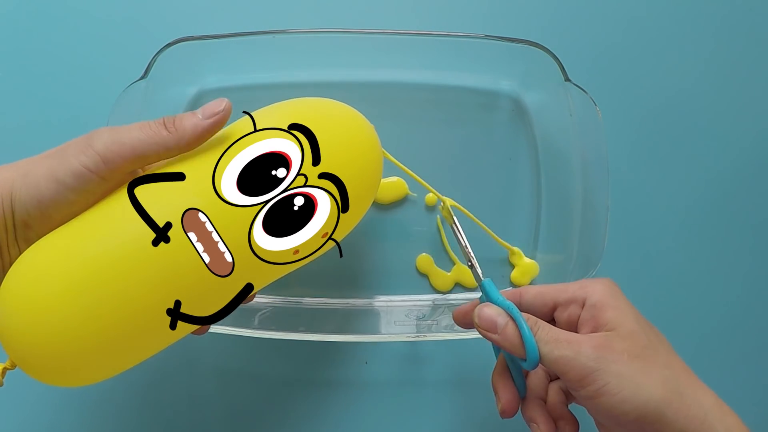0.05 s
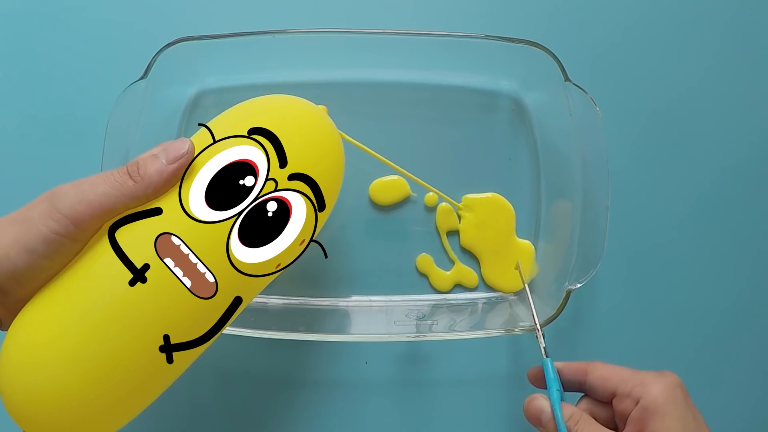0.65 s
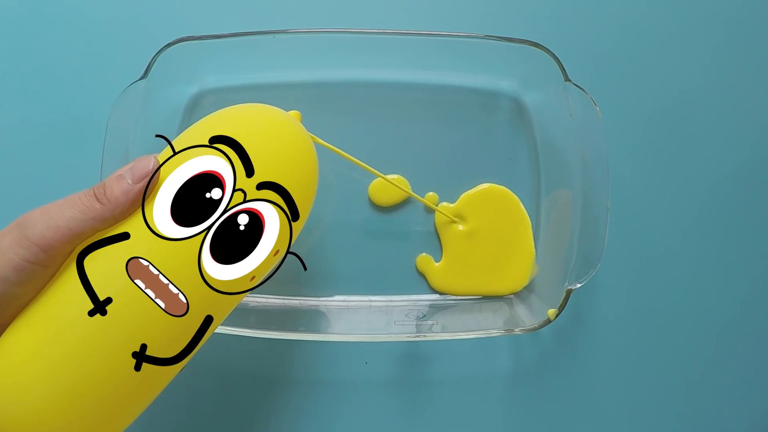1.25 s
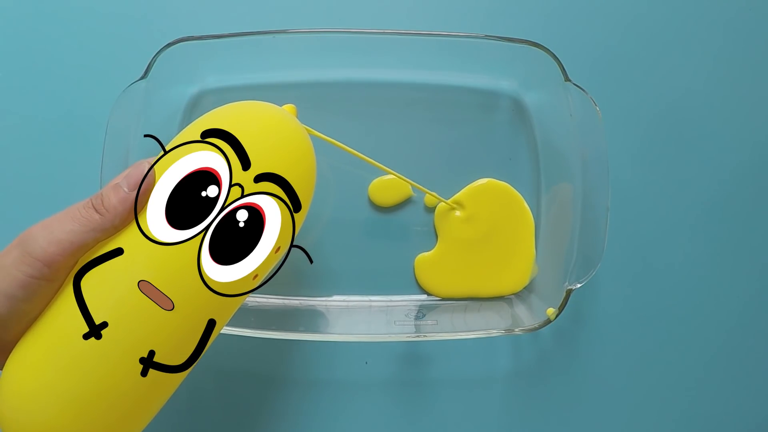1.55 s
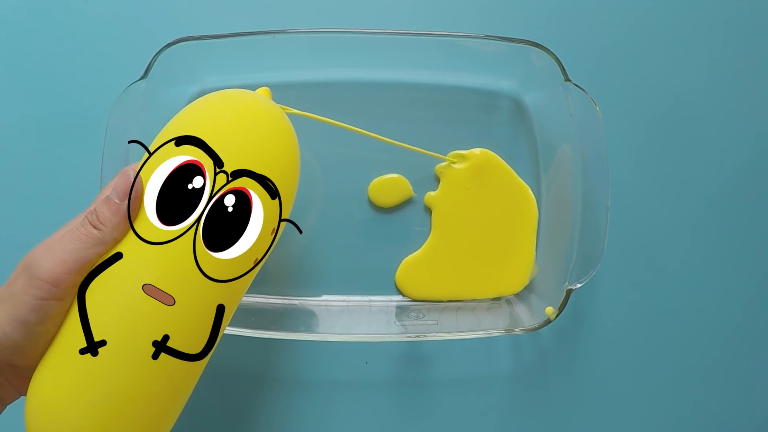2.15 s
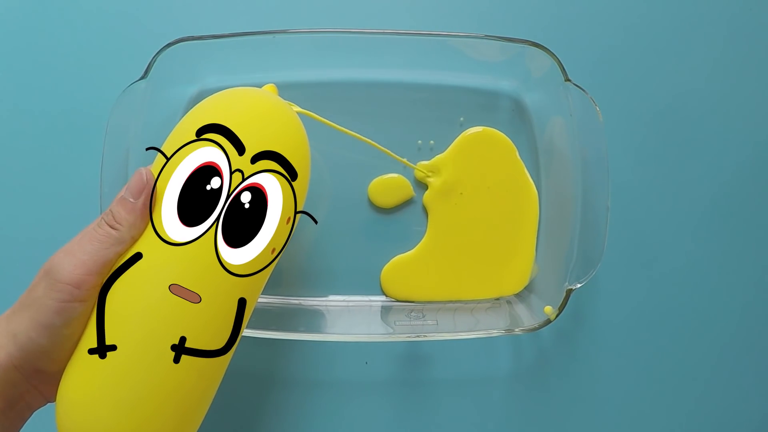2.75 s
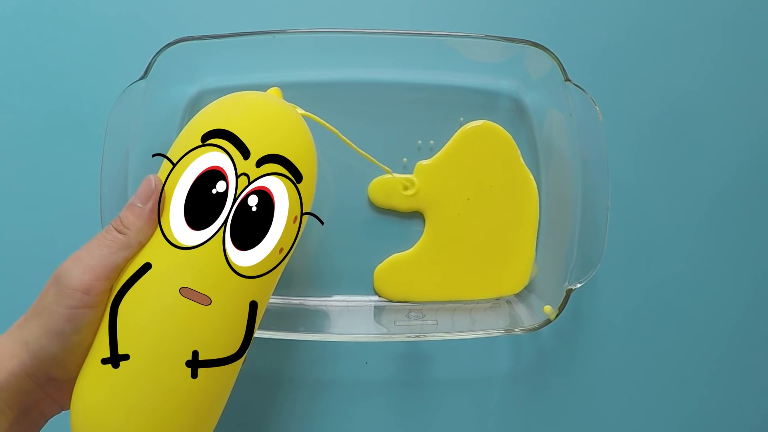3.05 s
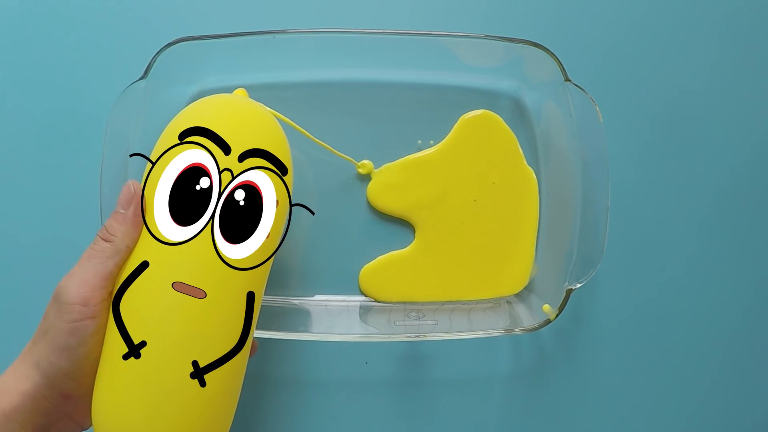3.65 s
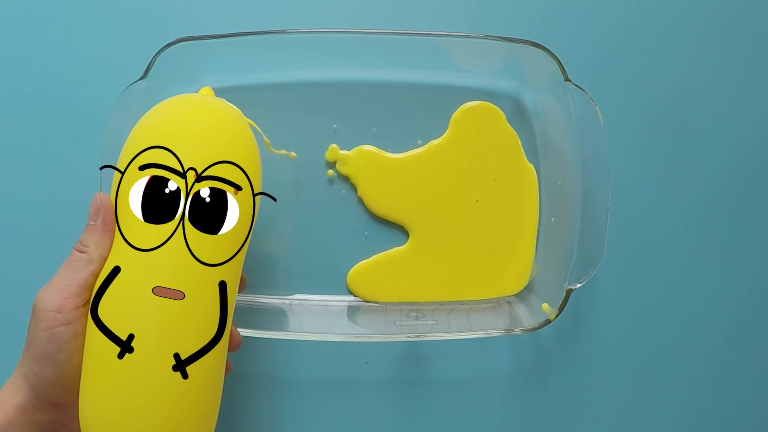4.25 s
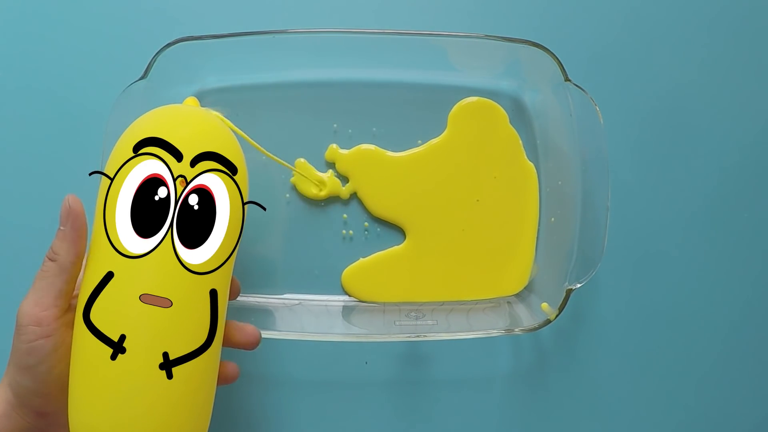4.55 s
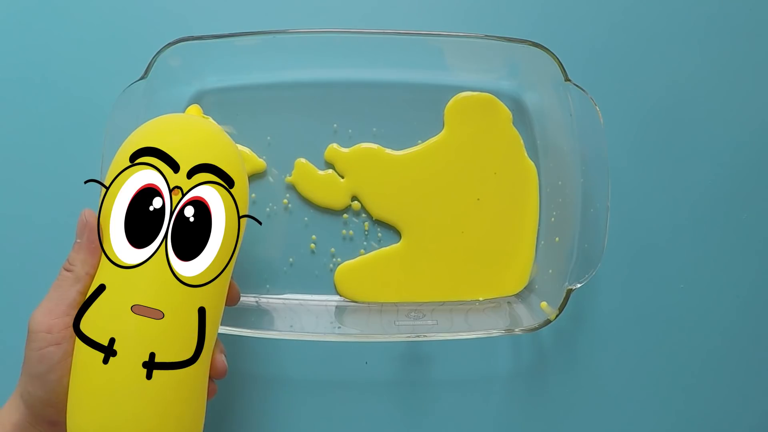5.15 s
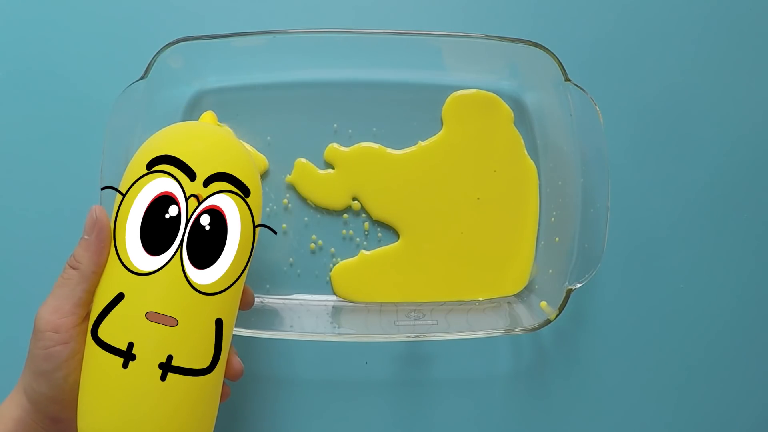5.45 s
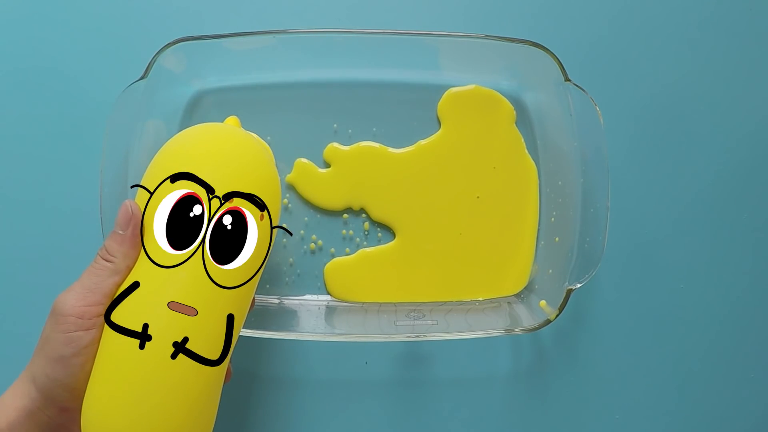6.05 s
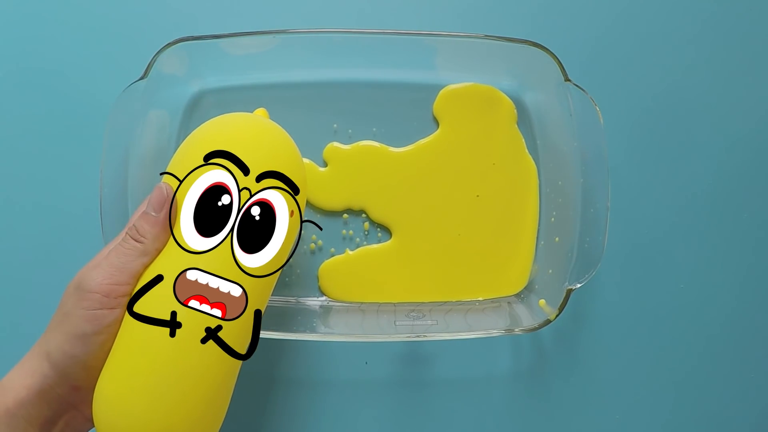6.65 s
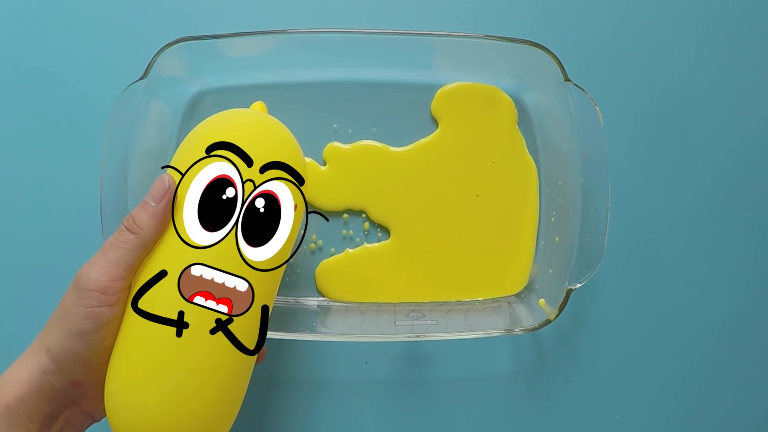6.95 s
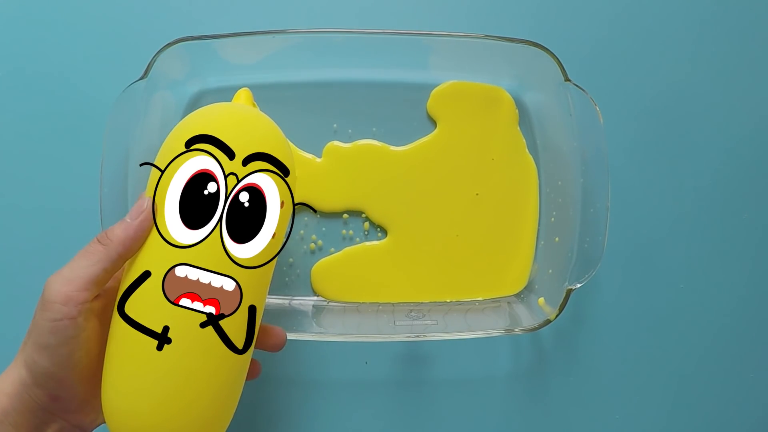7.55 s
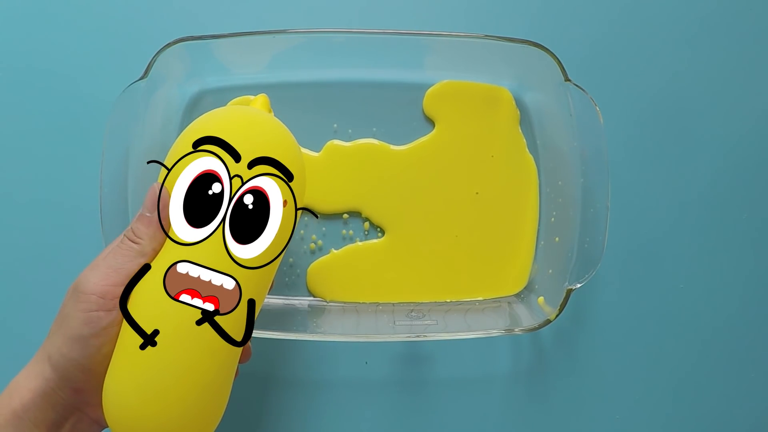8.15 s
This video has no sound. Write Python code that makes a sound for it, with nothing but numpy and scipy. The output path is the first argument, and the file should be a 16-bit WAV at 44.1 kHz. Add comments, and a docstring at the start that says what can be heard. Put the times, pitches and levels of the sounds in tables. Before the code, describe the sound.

Thick slime is squeezed through a slit in a balloon into a glass dish. Trapped air escapes in a rapid, uneven run of wet pops, spits and tiny high squeaks. After a short pause comes a louder cluster of pops, more squeaky sputtering, another pause and a last few pops. The sound is close, with a thin ring and a short echo in a bare, quiet room.

```python
"""Slime spurts from a snipped balloon into a glass dish, close up in a bare room.
Air caught in the slime escapes as it is squeezed: the rubber slit rasps and flutters in tiny rising
squeaks, and bubbles pop and spit droplets. The spurts set the balloon and the dish ringing thinly,
and the room carries each one on, over a faint rumble, hiss and hum."""
import sys
import numpy as np
from scipy import signal
from scipy.fft import rfft, irfft, next_fast_len
from scipy.io import wavfile
from scipy.ndimage import uniform_filter1d

SR = 44100
rng = np.random.default_rng(int(sys.argv[2]) if len(sys.argv) > 2 else 0)


def to_wav(s):
    """Save 16-bit WAV."""
    ch = np.atleast_2d(s).T  # columns
    pcm = np.round(np.clip(ch, -1, 1) * 32767)  # PCM
    wavfile.write(sys.argv[1], SR, pcm.astype(np.int16))


N = 365808
TIME = np.arange(N) / SR

# air squeaking through the slit: start_s, level_db, length_s, wetness (0 to 1)
SQUEAKS = [(0.646, -24, 0.0068, 0.5), (0.68, -28.5, 0.012, 1), (0.7626, -20.5, .007, 0.08),
           (.795, -17.5, 0.008, 0.34), (0.832, -22, 0.0097, 0.01), (.865, -18.5, 0.0077, 0.34),
           (.901, -20, .009, 0.08), (.937, -17.5, 0.0089, 0.22), (0.978, -22, 0.0034, 0.09),
           (1.01, -21, 0.011, 0.34), (1.05, -21, 0.0068, 0), (1.1353, -22, 0.0065, .3),
           (1.2036, -24.5, .008, .3), (1.468, -27.5, .016, 0.37), (1.62, -29.5, 0.0063, 1),
           (1.714, -34.5, .02, 0.9), (1.891, -23.5, 0.019, 0.2), (2.067, -31, 0.012, .8),
           (2.217, -26.5, 0.0098, 0.6), (2.346, -24.5, 0.0097, 0.26), (2.481, -30, 0.013, 0.3),
           (2.555, -26.5, 0.022, 0.17), (2.721, -31.5, 0.0081, 0.43), (2.759, -29.5, 0.036, 0),
           (2.983, -28, 0.014, 0.56), (3.072, -29, 0.0076, .5), (3.166, -27.5, 0.0081, .5),
           (3.26, -24, 0.0043, 0.28), (3.309, -32, .02, 0.33), (3.403, -25.5, 0.0056, 0.2),
           (3.458, -32, 0.02, 0.32), (3.56, -23.5, 0.0033, 0.21), (3.662, -32, 0.015, 0.9),
           (3.804, -27, 0.0057, 0.11), (3.864, -33, 0.0095, 0.02), (5.026, -26, 0.0093, 0.04),
           (5.076, -25, 0.016, 0.05), (5.14, -22, 0.0075, 0.12), (5.206, -42, 0.0053, 0),
           (5.275, -39.5, 0.0054, 0.16), (5.383, -31, 0.0023, 0), (5.431, -26, 0.0074, 0),
           (5.442, -25, 0.0069, 0.14), (5.6, -27.5, 0.019, 0.53), (5.658, -17, 0.0047, 0.08),
           (5.737, -23.5, 0.0055, 0.44), (5.803, -24.5, 0.01, .1), (5.843, -23.5, 0.01235, 0.33),
           (5.89, -23, 0.011, 0.2), (5.9395, -24, 0.0086, .3), (5.993, -20.5, 0.0092, 0.1),
           (6.041, -23.5, 0.01, 0.41), (6.099, -19.5, 0.0077, 0.02), (6.145, -27, 0.0097, 0.68),
           (6.197, -27, .011, 0.66), (6.246, -28, .014, 0.9), (6.317, -24.5, 0.0047, 0.54),
           (6.393, -25.5, 0.0088, 0.28), (6.457, -26, 0.009, 0.17), (6.52, -28.5, 0.012, 0.42),
           (6.574, -26.5, 0.011, 0.95), (6.625, -25.5, 0.0076, .9), (6.6785, -23, .016, 0.31),
           (6.747, -22.5, 0.012, 0.04), (6.8, -22, 0.0066, .1), (6.807, -27.5, 0.006, 0.04),
           (7.009, -33, 0.013, .1), (7.0442, -29.5, 0.0027, 0.9)]
# big bubbles bursting with a pop and a wet spit: peak_s, pop_db, spit_db
POPS = [(.687, -27, -42.5), (.716, -25, -23.5), (1.065, -26.5, -27), (1.09, -25.5, -22.5),
        (1.135, -30, -22.5), (1.143, -20, -28), (1.206, -16.5, -19), (1.234, -24.5, -36.5),
        (1.262, -21.5, -22), (1.3, -23, -28), (1.333, -21, -31), (1.38, -28, -28.5), (1.422, -19, -23),
        (1.47, -17, -22.5), (1.493, -21.5, -25), (1.53, -26.5, -29), (1.563, -20, -34.5),
        (1.573, -18.5, -25.5), (1.64, -18, -25), (1.72, -21.5, -25), (1.734, -22.5, -34), (1.761, -22, -32),
        (1.785, -26.5, -28.5), (1.805, -24, -26.5), (1.838, -20, -34), (1.9, -20, -27.5),
        (1.928, -31.5, -25.5), (1.941, -37, -29), (1.98, -23.5, -23), (1.99, -22, -25),
        (2.062, -18.5, -26.5), (2.071, -25, -23.5), (2.129, -26.5, -28.5), (2.14, -20.5, -36),
        (2.156, -24.5, -34), (2.223, -21.5, -30.5), (2.272, -20, -24), (2.284, -33, -33),
        (2.352, -19.5, -23), (2.486, -21.5, -25.5), (2.513, -28, -29), (2.571, -21, -23.5),
        (2.657, -19, -26), (2.712, -26.5, -46.5), (2.766, -19.5, -26.5), (2.798, -20.5, -24),
        (2.87, -25.5, -27), (2.888, -23.5, -30), (2.988, -23.5, -37), (3.003, -25.5, -29),
        (3.048, -43, -34), (3.079, -22.5, -24.5), (3.183, -26, -35.5), (3.315, -22.5, -30),
        (3.479, -24, -49), (3.59, -22, -27), (3.687, -20.5, -22), (3.872, -26.5, -22), (3.9, -25, -35),
        (4.799, -12.5, -30), (4.817, -8, -22), (4.826, -23.5, -24), (4.85, -22, -35.5), (4.873, -17, -29.5),
        (4.886, -13.5, -25.5), (4.909, -23.5, -32.5), (4.928, -20.5, -24.5), (5.429, -24, -29.5),
        (5.472, -32, -27), (5.489, -29, -28.5), (5.538, -23, -18), (5.559, -18, -29.5), (5.608, -17, -26.5),
        (5.657, -21.5, -21.5), (5.68, -26.5, -24), (5.74, -23, -29.5), (6.618, -31, -35), (6.803, -28, -47),
        (6.811, -26.5, -32), (6.833, -29.5, -26), (6.856, -26.5, -37), (6.876, -27, -34.5),
        (6.925, -29.5, -30), (7.046, -34, -28.5), (8.091, -23, -44.5), (8.103, -14, -21), (8.116, -33, -45),
        (8.138, -21, -30.5), (8.169, -25, -33), (8.195, -15.5, -34), (8.263, -23.5, -29)]
# the balloon rings higher and goes slack as it empties; levels are relative to a pop:
# time_s, low_mode_hz, high_mode_hz, ring_db, flap_db
BALLOON = [(0, 1310, 3177, -9, -32), (1.2, 1470, 3230, -28.5, -17), (3.65, 1590, 3497, -28.5, -25),
           (3.87, 1530, 3558, -15.5, -20), (4.9, 1530, 3486, -29.5, -15), (5.7, 1670, 3787, -21, -17.5),
           (6.9, 1706, 3826, -22.5, -8.5), (8.3, 1703, 3710, -38, -14)]


def amp(db):
    return 10 ** (np.asarray(db) / 20)


def unit(x):
    return x / np.sqrt(np.mean(x ** 2) + 1e-20)


def spectrum_at(points, hz):
    """A spectrum's value at hz, joined on a log-frequency axis."""
    freqs, values = np.transpose(points)
    return np.interp(np.log(hz + 1), np.log(freqs + 1), values)


def along(table, s):
    """The columns of a curve at time s."""
    times, *columns = np.transpose(table)
    return [np.interp(s, times, column) for column in columns]


def add(mix, start_s, sound):
    part = mix[max(round(start_s * SR), 0):][:len(sound)]
    part += sound[:len(part)]


def colour(x, points):
    """Filters x by a spectrum; white noise keeps its power."""
    size = next_fast_len(len(x))
    gain = unit(amp(spectrum_at(points, np.fft.rfftfreq(size, 1 / SR))))
    return irfft(rfft(x, size) * gain, size)[:len(x)]


def resonate(x, hz, width_hz):
    """A resonance that follows the curve hz."""
    turn = np.exp(2j * np.pi * np.cumsum(hz * np.ones(len(x))) / SR)
    pole = np.exp(-np.pi * width_hz / SR)
    return 2 * (turn * signal.lfilter([1 - pole], [1, -pole], x / turn + 1e-18)).real


def wobble(count, smooth):
    """A random waver of rms 1, smoothed over `smooth` samples."""
    return unit(uniform_filter1d(uniform_filter1d(rng.standard_normal(count), smooth), smooth))


def swell(t, length_s, rise, fall):
    """A burst envelope that peaks at t = 0: steep before, dying exponentially after."""
    return np.where(t < 0, np.exp(-(t / (rise * length_s)) ** 2), np.exp(-abs(t) / (fall * length_s)))


def fade(t, t60_s):
    return amp(-60 * t / t60_s)


def room_tone(noise_db=-60, hum_hz=49, overtone_db=-2.0):
    """Quiet room rumble and hiss, with a low hum that grows late on."""
    # rumble sloping off into hiss: freq_hz, gain_db
    noise_colour = [(20, -40.5), (35, -20.5), (55, -0.5), (110, 0.5), (200, -6), (350, -7.5), (600, -17.5),
                    (1400, -21), (2500, -25), (8000, -27.5), (15000, -33)]
    # the hum's slow rise: time_s, level_db
    hum_level = [(0, -90.5), (6.2, -77.5), (7.2, -66.5), (8.3, -64)]
    noise = unit(colour(rng.standard_normal(N), noise_colour))
    phase = 2 * np.pi * hum_hz * TIME
    hum = unit(np.sin(phase) + amp(overtone_db) * np.sin(4 * phase))
    return amp(noise_db) * noise + amp(along(hum_level, TIME)[0]) * hum


def opening_tail(level_db=-39.5, t60_s=0.62, ring_db=-6.5, ring_t60_s=0.58):
    """An earlier spurt is still dying away in the room and in the balloon."""
    # the spurt's lingering wash: freq_hz, gain_db
    wash_colour = [(180, -49), (300, -33), (869, -19.5), (1250, 0), (2690, -17.5), (3170, 0), (3610, -19.5),
                   (5350, -5), (5900, -10), (15000, -28.5)]
    wash = unit(colour(rng.standard_normal(N), wash_colour)) * fade(TIME, t60_s)
    high_mode_hz = BALLOON[0][2]
    ring = np.sin(2 * np.pi * high_mode_hz * TIME) * fade(TIME, ring_t60_s)
    return amp(level_db) * (wash + amp(ring_db) * ring)


def room_tail(build_s=0.00067):
    """Dense reflections, each band dying at its own speed."""
    # how long the bare room rings: freq_hz, t60_s
    decay_times = [(200, .5), (800, 0.67), (2000, 0.66), (5500, 0.61), (9000, .55), (15000, 0.52)]
    # tone of the reflections: freq_hz, gain_db
    wall_colour = [(100, 12), (1500, -1), (2500, 3), (5000, 0.5), (8000, -2.5), (11000, -2), (15000, 1)]
    hz, t, bands = signal.stft(rng.standard_normal(SR), SR, nperseg=256)
    bands *= fade(t, spectrum_at(decay_times, hz)[:, None])
    tail = signal.istft(bands, SR, nperseg=256)[1][:SR]
    build = 1 - np.exp(-(TIME[:SR] / build_s) ** 2)
    tail = colour(tail * build, wall_colour)
    return tail / np.linalg.norm(tail)


def room(x, wet_db=-6.0, table_db=-19.0, table_s=0.0031, drift_hz=1.293, tails=3):
    """The table throws back one close echo, the walls a long tail that shifts as the balloon moves."""
    echo = np.interp(TIME - table_s, TIME, x)
    walls = np.zeros(N)
    for k in range(tails):
        crossfade = np.cos(np.pi * (drift_hz * TIME + k / tails))
        walls += signal.oaconvolve(x * crossfade, room_tail())[:N]
    return amp(table_db) * echo + amp(wet_db) * walls * np.sqrt(2 / tails)


def dish(x):
    """The spurts set the glass dish ringing faintly."""
    # modes of the glass: pitch_hz, width_hz, gain_db
    modes = [(732, 9.9, 0.5), (5010, 38, -1), (5443, 28, -3), (7550, 18, -4.5)]
    return sum(amp(db) * resonate(x, hz, width_hz) for hz, width_hz, db in modes)


def balloon(x, low_db=-11.5, low_width_hz=80, high_t60_s=0.516, waver_hz=32,
            third_hz=5200, third_db=-10.5, third_t60_s=0.27):
    """The low mode booms along with every spurt; each big pop also kicks a thin, wavering ring and a fainter,
    shorter tone near 5.2 kHz."""
    out = amp(low_db) * resonate(x, along(BALLOON, TIME)[0], low_width_hz)
    t = TIME[:SR // 2]
    for s, pop_db, _ in POPS:
        _, high_hz, ring_db, _ = along(BALLOON, s)
        phase = 2 * np.pi * np.cumsum(high_hz + waver_hz * wobble(len(t), smooth=400)) / SR
        ring = np.sin(phase) * fade(t, high_t60_s)
        ring += amp(third_db) * np.sin(third_hz / high_hz * phase) * fade(t, third_t60_s)
        add(out, s, amp(pop_db + ring_db) * ring * rng.choice([-1, 1]))
    return out


def ticks(decay_s=0.00086, width_hz=3500):
    """Tiny damped ticks of rubber and slime."""
    # stray ticks between squeezes: start_s, peak_db, pitch_hz
    strays = [(.3494, -63, 3000), (4.096, -33.5, 5460), (4.4508, -37, 8560), (8.005, -44.5, 1560)]
    out, t = np.zeros(N), TIME[:SR // 50]
    for s, db, hz in strays:
        tick = resonate(rng.standard_normal(len(t)) * np.exp(-t / decay_s), hz, width_hz)
        add(out, s, amp(db) * tick / abs(tick).max())
    return out


def rasps(length_s=0.0067, lead_s=0.006):
    """Air rushes through the parting slit just before the rubber starts to flutter."""
    # strength of the rasp relative to its squeak: time_s, gain_db
    rasp_level = [(.65, -43), (1.1, -19), (2.5, -6), (3, -4.5), (3.55, -7), (5, -22.5), (6.4, -24),
                  (6.6, -8.5), (6.8, -11)]
    # tone of the rushing air: freq_hz, gain_db
    rasp_colour = [(400, -41), (1200, -7), (2100, 3.5), (4000, 2.5), (6000, -8), (9500, -3), (13000, -24)]
    envelope, t = np.zeros(N), np.arange(-SR // 100, SR // 40) / SR
    for s, db, *_ in SQUEAKS:
        puff = amp(db + along(rasp_level, s)[0]) * swell(t, length_s, rise=0.26, fall=0.76)
        add(envelope, s - lead_s + t[0], puff)
    return envelope * unit(colour(rng.standard_normal(N), rasp_colour))


def squeaks(rise=0.16, jitter=0.02, sweep=0.48, open_share=0.19, hiss=0.081, flicker_db=4.0,
            dry_width_hz=890, wet_width_hz=8800, wet_lift_hz=1520, low_cut_hz=1280):
    """Air flutters the rubber slit; its resonance climbs and levels off, and low partials die first."""
    # the slit's lips tighten and ease with the squeeze: time_s, flutter_hz, resonance_hz
    slit = [(.65, 1937, 8000), (.77, 1660, 8170), (.9, 1600, 6970), (.94, 1926, 7470), (1.5, 1711, 7860),
            (2.3, 1682, 8780), (3.86, 1790, 8380), (5.02, 1890, 8460), (5.14, 1928, 5820),
            (5.42, 1788, 5200), (5.66, 1842, 8350), (5.81, 1617, 7170), (5.89, 1650, 7600),
            (6.02, 1964, 8300), (6.21, 1772, 7300), (6.38, 2090, 7630), (6.58, 1733, 7700),
            (6.68, 1817, 5830), (6.75, 1637, 6800), (6.81, 1708, 5830)]
    out, harmonic = np.zeros(N), np.arange(1, 9)[:, None]
    for s, db, length_s, wet in SQUEAKS:
        count = max(int(length_s * SR), 64)
        progress = np.linspace(0, 1, count)
        flutter_hz, slit_hz = along(slit, s)
        flutter_hz *= (0.01 / length_s) ** 0.087  # longer squeaks come from bigger bubbles and sit lower
        climb = rise * (np.sqrt(progress) - np.sqrt(0.5))
        pitch_hz = flutter_hz * (1 + climb + jitter * wobble(count, smooth=24))
        # slime in the slit widens its resonance and lifts it
        width_hz = dry_width_hz + wet * wet_width_hz
        centre_hz = (slit_hz + wet * wet_lift_hz) * (1 - sweep * np.exp(-progress / open_share))
        skirt = (0.043 + 0.19 * wet) * (1 - progress) / np.sqrt(harmonic)
        gains = skirt + 1 / (1 + (2 * (harmonic * pitch_hz - centre_hz) / width_hz) ** 2)
        # the rubber cannot follow partials far above its resonance
        gains /= 1 + (harmonic * pitch_hz / (centre_hz + 0.71 * width_hz)) ** 10
        phase = 2 * np.pi * harmonic * np.cumsum(pitch_hz) / SR
        phase += 0.88 * rng.standard_normal(harmonic.shape)
        tone = unit((gains * np.sin(phase)).sum(0))
        air = resonate(rng.standard_normal(count), centre_hz, width_hz=5000)
        air = unit(resonate(air, centre_hz, width_hz=5000))
        lean = 0.7 + 0.38 * (1 - wet)  # dry squeaks peak later
        flow = abs(np.sin(np.pi * progress ** lean)) ** 0.51
        flow *= amp(flicker_db * wobble(count, smooth=30))
        add(out, s, amp(db) * unit((tone + hiss * air) * flow))
    # a high-pass keeps low knocks out of the squeaks
    return signal.sosfilt(signal.butter(4, low_cut_hz, "high", fs=SR, output="sos"), out)


def froth(per_s, spread_db, sizes=18):
    """A swarm of pinhead bubbles, each a rising blip a few cycles long."""
    out = np.zeros(N)
    for hz in np.linspace(1400, 14000, sizes):
        progress = np.linspace(0, 1, int(9 * SR / max(hz, 3000)))
        phase = 2 * np.pi * np.cumsum(hz * (0.9 + 0.2 * progress)) / SR
        blip = np.sin(phase) * np.sqrt(progress) * (1 - progress) ** 2
        births = np.flatnonzero(rng.random(N) < per_s / sizes / SR)
        train = np.zeros(N)
        train[births] = rng.choice([-1, 1], len(births)) * amp(spread_db * rng.random(len(births)))
        out += signal.oaconvolve(train, blip / np.linalg.norm(blip))[:N]
    return unit(out)


def bubbles(followers=2, after_db=-10.5, spread_db=2.5, min_wait_s=0.005, extra_wait_s=0.016,
            ordinary_s=0.003, ordinary_db=-21.5, doubling_db=50.5, pitch_scatter=0.022):
    """Big bursts and the small ones in their wake: peak_s, pop_db, spit_db, length_s, pitch_hz."""
    # pops rise as the balloon empties: time_s, pitch_hz
    pop_pitch = [(.7, 1356), (1.2, 1445), (2.6, 1501), (4.8, 1499), (5.6, 1649), (8.2, 1614)]
    rows = []
    for s, pop_db, spit_db in POPS:
        rows.append((s, pop_db, spit_db))
        for wait, size in zip(rng.exponential(1, followers), rng.standard_normal(followers)):
            drop_db = after_db + spread_db * size
            rows.append((s + min_wait_s + extra_wait_s * wait, pop_db + drop_db, spit_db + drop_db))
    s, pop_db, spit_db = np.transpose(rows)
    length_s = ordinary_s * 2 ** ((pop_db - ordinary_db) / doubling_db)  # louder pops ring longer
    pitch_hz = along(pop_pitch, s)[0] * (1 + pitch_scatter * rng.standard_normal(len(s)))
    return np.transpose([s, pop_db, spit_db, length_s, pitch_hz])


def spits(bursts, length_s=0.0028, hiss=0.73, spray_db=-13.0, pop_spray_db=-21.0, spray_s=0.02,
          drops_per_s=900, clump_db=5.5):
    """Films of slime tear into bursts of froth; spits and big pops leave a thinning crackle behind."""
    # bright, wet tone of the spit: freq_hz, gain_db
    spit_colour = [(120, -21), (350, -15), (650, -19), (1300, 2.5), (2500, -3.5), (4200, -2.5), (5300, 4),
                   (6300, -3.5), (7800, 4), (10000, -1.5), (12000, -6), (15000, -1)]
    tear_power, spray_power = np.zeros(N), np.zeros(N)
    t = np.arange(-SR // 100, SR // 5) / SR
    tear = swell(t, length_s, rise=1.0, fall=0.9)
    thinning = (t > 0) * np.exp(-abs(t) / spray_s)
    for s, _, spit_db, *_ in bursts:
        add(tear_power, s + t[0], (amp(spit_db) * tear) ** 2)
        add(spray_power, s + t[0], (amp(spit_db + spray_db) * thinning) ** 2)
    for s, pop_db, _ in POPS:
        add(spray_power, s + t[0], (amp(pop_db + pop_spray_db) * thinning) ** 2)
    fizz = froth(per_s=3600, spread_db=-0.5) + hiss * rng.standard_normal(N)
    fizz /= np.sqrt(uniform_filter1d(fizz ** 2, size=130) + 1e-9)  # evens out the level
    crackle = unit(froth(drops_per_s, spread_db=18) * amp(clump_db * wobble(N, smooth=150)))
    return colour(np.sqrt(tear_power) * fizz + np.sqrt(spray_power) * crackle, spit_colour)


def pops(bursts, glide=0.0806, jitter=0.075):
    """Each bursting bubble rings for a few cycles with a sliding pitch, and flaps the balloon's skin."""
    # tone of the flapping rubber: freq_hz, gain_db
    flap_colour = [(130, -26.5), (220, -17), (310, -11.5), (430, -1.5), (560, -5), (730, 4.5), (1000, -4),
                   (2400, 3), (4000, -6.5), (9000, -35.5)]
    tones, flaps = np.zeros(N), np.zeros(N)
    t = np.arange(-SR // 100, SR // 40) / SR
    for s, db, _, length_s, hz in bursts:
        envelope = amp(db) * swell(t, length_s, rise=0.57, fall=1.0)
        slide = glide * rng.uniform(-1.134, 1.992) * np.tanh(t / length_s)  # more often up than down
        pitch_hz = hz * (1 + slide + jitter * wobble(len(t), smooth=30))
        add(tones, s + t[0], envelope * unit(np.sin(2 * np.pi * np.cumsum(pitch_hz) / SR)))
        add(flaps, s + t[0], envelope * rng.standard_normal(len(t)))
    *_, flap_db = along(BALLOON, TIME)
    return tones + amp(flap_db) * colour(flaps, flap_colour)


def scene():
    """Spurts at the slit set the balloon and the dish ringing; all of it sounds into the room."""
    bursts = bubbles()
    spurts = rasps() + squeaks() + pops(bursts) + spits(bursts) + ticks()
    near = spurts + balloon(spurts) + dish(spurts)
    return (near + room(near) + opening_tail() + room_tone())[None]


def record(dry, cutoff_hz=15250):
    """The loudest pops flatten softly against full scale; a steep low-pass trims the top."""
    limited = dry / (1 + dry ** 8) ** (1 / 8)
    low_pass = signal.firwin(301, cutoff_hz, window=("kaiser", 8), fs=SR)
    return signal.oaconvolve(limited, low_pass[None], "same")


dry = scene()
out = record(dry)
to_wav(out)
```